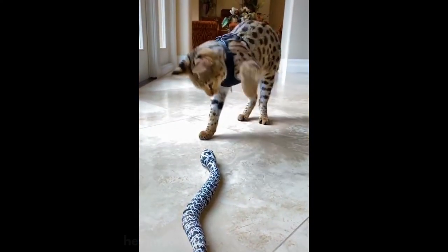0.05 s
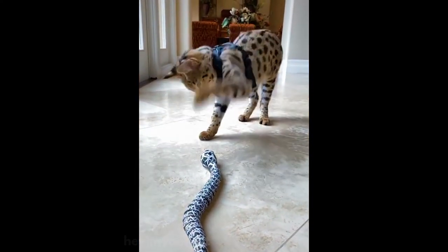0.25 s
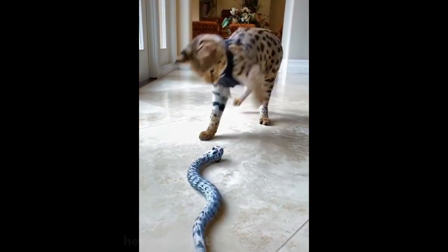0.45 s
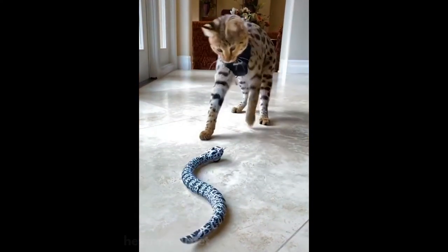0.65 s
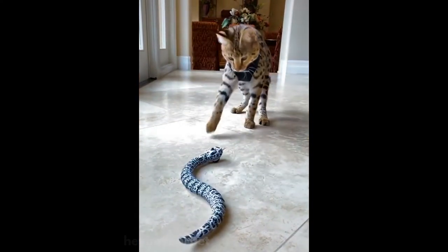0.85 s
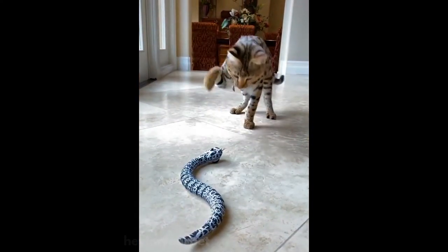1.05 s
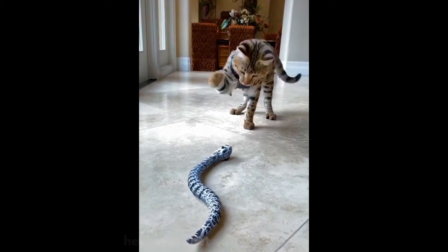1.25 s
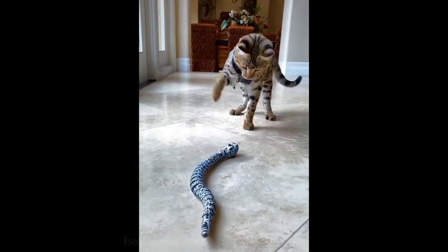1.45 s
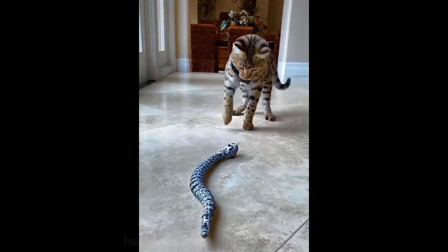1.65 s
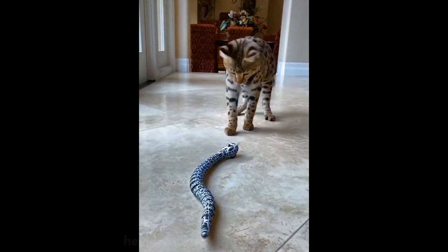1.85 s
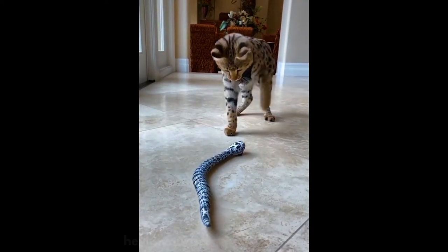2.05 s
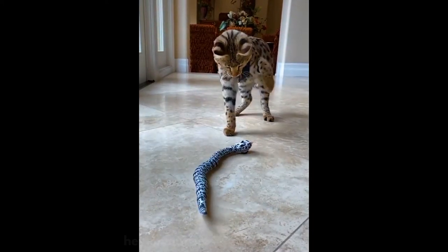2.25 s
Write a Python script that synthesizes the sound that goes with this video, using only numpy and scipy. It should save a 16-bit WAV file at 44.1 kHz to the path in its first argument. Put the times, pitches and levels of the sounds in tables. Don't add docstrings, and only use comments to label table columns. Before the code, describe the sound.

Cat hissing: one sudden spit and two short bubbly hisses, with hard plastic clicks in a tiled hall.

```python
import sys
import numpy as np
from scipy import signal
from scipy.fft import rfft, irfft, next_fast_len
from scipy.io import wavfile
from scipy.ndimage import map_coordinates

SR = 44100
rng = np.random.default_rng(int(sys.argv[2]) if len(sys.argv) > 2 else 0)


def gain_from_db(level_db):
    decades = np.asarray(level_db, float) / 20
    return 10 ** decades


def wav_out(sig):
    wavfile.write(sys.argv[1], SR, np.round(np.clip(np.atleast_2d(sig).T, -1, 1) * 32767).astype(np.int16))


N = 99225


def along(points, hz):
    point_hz, value = np.transpose(points)
    return np.interp(np.log(hz + 1), np.log(point_hz + 1), value)


def resonance(f, centre_hz, width_hz):
    damping = 1j * f * width_hz
    return damping / (centre_hz ** 2 - f * f + damping)


def high_pass(f, edge_hz):
    return -f * f / (edge_hz ** 2 - f * f + 1.2j * f * edge_hz)


def filtered(x, response):
    size = next_fast_len(N + 8192)
    spectrum = rfft(x, size) * response(np.fft.rfftfreq(size, 1 / SR))
    return irfft(spectrum, size)[..., :N]


def noise(response):
    white = rng.standard_normal(N)
    return white, 1 / np.std(filtered(white, response))


def puffs(rows, rise_s):
    start, gain, decay = np.transpose(rows)[..., None]
    t = np.arange(SR // 40) / SR
    rise = 1 - np.exp(-(t / rise_s) ** 2)
    shape = gain * rise * np.exp(-t / np.maximum(decay, 1e-4))
    at = (start * SR).astype(int) + np.arange(len(t))
    return np.bincount(at.ravel(), shape.ravel(), N + SR)[:N]


def hall(x):
    # frequency in Hz, time to fall by 60 dB in seconds.
    ring_times = [(500, 0.72), (2500, 0.65), (5000, 0.62), (9000, 0.45), (13000, 0.24)]
    hz, t, z = signal.stft(rng.standard_normal(SR), SR, nperseg=256)
    fading = z * gain_from_db(-60 * t / along(ring_times, hz)[:, None])
    tail = signal.istft(fading, SR, nperseg=256)[1]
    delayed = np.pad(x, (400, 0))
    return signal.fftconvolve(delayed, tail / np.linalg.norm(tail))[:N]


def room_tone():
    # frequency in Hz, level in dB per Hz.
    air_curve = [(20, -28.5), (40, -6), (62, 2), (130, -7.5), (330, -13), (700, -20), (5000, -29),
                 (13500, -42.5)]
    hum_hz, hum_width_hz = 250, 14
    air = lambda f: gain_from_db(along(air_curve, f))
    hum = lambda f: 1 / (1 + (2 * (f - hum_hz) / hum_width_hz) ** 2)
    out = np.zeros(N)
    for level_db, colour in ((-57.5, air), (-70.5, hum)):
        white, gain = noise(colour)
        out += gain_from_db(level_db) * gain * filtered(white, colour)
    return out


def claws():
    # start in seconds, level in dB, decay in ms, centre in Hz, width in Hz.
    ticks = [
        (.1048, -27.5, 2.25, 5200, 2900),
        (.2105, -25.5, 3.5, 1600, 352),
        (0.212, -22.5, 12.5, 2360, 590),
        (0.215, -37, 6.9, 4170, 700),
        (0.219, -30, 9.7, 9000, 1790),
        (0.339, -15, 4.4, 9200, 2500),
        (1.473, -49, 3.1, 8300, 5000),
    ]
    out = np.zeros(N)
    for start, db, ms, centre_hz, width_hz in ticks:
        colour = lambda f: resonance(f, centre_hz, 1.5 * width_hz) ** 2
        white, gain = noise(colour)
        swell = puffs([(start, gain_from_db(db), ms / 1000)], 0.0014)
        out += gain * filtered(np.sign(white) * swell, colour)
    return out


def toy():
    # start in seconds, peak in dB, extra brightness in dB, hollow knock in dB.
    snaps = [
        (.1056, -26, -15, -1.5),
        (0.9151, -14.5, 3, 0.9),
        (1.083, -14, -30, 2),
        (1.6266, -15, 3.4, -2),
        (1.966, -14, -7, 3.5),
    ]
    # frequency in Hz, level in dB, time to fall by 60 dB in seconds.
    shell_tones = [(737.5, -7.5, 0.023), (952, -9, 0.02), (1463, -13.5, 0.021), (1768, -5, 0.0114),
                   (1930, -3.5, 0.013), (3140, -13.5, 0.026), (4447, 2.5, 0.025), (5840, 0, 0.012),
                   (6350, 7, 0.0073), (6860, -1, 0.012), (8400, -7, 0.012), (9210, -5.5, 0.0075),
                   (12100, -52, 0.0075), (12900, -20, .008)]
    bright_above_hz, scatter_db = 2600, 1.5
    knock_ring_s, longest_ring_s, choked_after_s = .04, .03, .0075
    rattle_db, rattle_t60 = -10.5, 0.01

    out, t = np.zeros(N + SR), np.arange(SR // 10) / SR
    hz, level_db, t60 = np.transpose(shell_tones)[..., None]
    is_knock = hz == hz.min()
    t60 = np.minimum(t60, np.where(is_knock, knock_ring_s, longest_ring_s))
    choke = np.exp(-(~is_knock).astype(float) * (t / choked_after_s) ** 2)
    fade = 1000 ** (-t / t60) * choke
    rise = 1 - np.exp(-t / .0003)
    for start, db, bright_db, knock_db in snaps:
        tone_db = level_db + bright_db * (hz > bright_above_hz) + knock_db * is_knock
        gain = gain_from_db(tone_db + scatter_db * rng.standard_normal(hz.shape))
        ring = (gain * fade * np.sin(2 * np.pi * hz * t)).sum(0) * rise
        rattle_fade = 1000 ** (-t / rattle_t60)
        rattle = gain_from_db(rattle_db + bright_db) * rattle_fade * rng.standard_normal(len(t))
        out[round(start * SR):][:len(t)] += gain_from_db(db - 4) * (ring + rattle)
    dry = filtered(out[:N], lambda f: high_pass(f, 550))
    return dry + gain_from_db(-29) * hall(dry)


def hiss(effort, bursts, mouth, edge_hz, leak_db):
    t = np.arange(N) / SR
    s, db, teeth_db = np.transpose(effort)
    flow = gain_from_db(np.interp(t, s, db, left=-120, right=-120))

    bubbles_per_s, bubble_s, bubble_db, bubble_spread_db = 150, .001, 2.5, 6
    burst_rise_s, burst_db = .0006, -3
    draw = rng.random((400, 2))
    when = s[0] + np.cumsum(-np.log(draw[:, 0])) / bubbles_per_s
    size = gain_from_db(bubble_db + bubble_spread_db * (2 * draw[:, 1] - 1.5))
    rows = np.c_[when, size, np.full(len(when), bubble_s)]
    bubbles = puffs(rows[when < s[-1]], burst_rise_s)
    rows = [(start - burst_rise_s, gain_from_db(peak_db + burst_db), ms / 1000) for start, peak_db, ms in bursts]
    big = puffs(rows, burst_rise_s)

    def tract(f):
        bands = []
        for k, (centre_hz, width_hz, level_db) in enumerate(mouth):
            band = resonance(f, centre_hz, max(width_hz, 350))
            bands.append((-1) ** k * gain_from_db(level_db) * high_pass(f, edge_hz) ** 3 * band)
        bands.append(gain_from_db(leak_db) * resonance(f, 900, 900))
        return np.array(bands)

    white, gain = noise(lambda f: tract(f).sum(0))
    bands = filtered(white * flow * (0.85 + bubbles) + np.sign(white) * big, tract)

    shifts_per_s, shift_db = 45, 2.2
    knots = rng.standard_normal((len(bands), int(N / SR * shifts_per_s) + 4))
    waver_db = shift_db * np.array([map_coordinates(k, [t * shifts_per_s]) for k in knots])
    upper = np.array([centre_hz > 5500 for centre_hz, _, _ in mouth] + [False])[:, None]
    return gain * (bands * gain_from_db(waver_db + upper * np.interp(t, s, teeth_db))).sum(0)


def cat():
    # time in seconds, effort in dB, extra sharpness at the teeth in dB.
    efforts = [
        [(.207, -51, -3.5), (.213, -23, -7.5), (.226, -16, -9), (.236, -32, -2.5), (.252, -33.5, -5.5),
         (.264, -20, -3.5), (.3, -29.5, -6.5), (.345, -27.5, 4), (.4, -37, -1)],
        [(.94, -53, 4.5), (.952, -44, -0.5), (.985, -38.5, 0.5), (1.015, -31, -2.5), (1.085, -27, 1.5),
         (1.14, -34.5, -0.5), (1.17, -34.5, 2.5), (1.225, -32, -0.5), (1.3, -43, -8.5)],
        [(1.71, -60, 5.5), (1.73, -49, 3), (1.765, -39.5, 5.5), (1.79, -36, -2.5), (1.86, -34.5, 1),
         (1.92, -31.5, -2), (1.97, -30, -0.5), (2.0, -36, -4), (2.1, -49, -10)],
    ]
    # start in seconds, peak in dB, length in ms.
    spit_bursts = [(0.284, -12, 0.81), (.294, -15.5, 4.9), (0.326, -20.5, 1.3), (0.3374, -4.5, 2.16),
                   (0.3429, -14.5, 1.3), (0.444, -23.5, 4.4)]
    middle_bursts = [(.950, -24, 2), (0.965, -33, 1.1), (0.998, -16.5, 1.18), (1.013, -13.5, 3.04),
                     (1.026, -17, 1.6), (1.056, -17, 1.2), (1.063, -11, 0.78), (1.081, -22, 1.1),
                     (1.0907, -18, 1), (1.102, -13.5, 1.2), (1.12, -17, 2.5), (1.145, -10, 0.4),
                     (1.158, -9.5, 1.33), (1.169, -16, 1.9), (1.178, -15, 0.83), (1.205, -24, 0.48),
                     (1.213, -13, 1.16), (1.2198, -13, 1.44), (1.2245, -18, 0.63)]
    last_bursts = [(1.727, -33.5, 2.7), (1.756, -37, 1.5), (1.785, -15, 1.16), (1.79, -16.5, 1.04),
                   (1.797, -18, 1.7), (1.811, -19, 0.78), (1.832, -14.5, 1.8), (1.862, -20, 1),
                   (1.886, -29, 1.05), (1.9045, -22, 1.4), (1.9177, -14, 1.1), (1.939, -25, 1.1),
                   (1.9456, -20, 1.6), (1.9514, -10.5, 0.57), (1.9586, -2.5, 0.5), (1.964, -16, 1.2),
                   (1.978, -14, 1.4)]
    # centre in Hz, width in Hz, level in dB.
    spit_mouth = [(1600, 600, -12.5), (2500, 550, -0.5), (4080, 1120, -1.5), (5940, 1900, -2),
                  (8830, 1620, -4.5), (13500, 2400, -21.5)]
    middle_mouth = [(1970, 530, -4.5), (2480, 550, -2.5), (3910, 565, 0), (4960, 630, -0.5),
                    (6200, 2000, -8.5), (8810, 940, -1.5), (12600, 1200, -29.5)]
    last_mouth = [(1850, 400, -7.5), (2500, 510, -3), (3807, 480, -1.5), (4857, 604, -4), (6060, 880, -7),
                  (8840, 1010, -3.5), (12600, 400, -32)]
    edges_hz = [1400, 1750, 1750]
    leaks_db = [-20, -27, -27.5]
    hall_levels_db = [-9, -12, -9.5]
    all_bursts = (spit_bursts, middle_bursts, last_bursts)
    mouths = (spit_mouth, middle_mouth, last_mouth)
    out = np.zeros(N)
    for *settings, hall_db in zip(efforts, all_bursts, mouths, edges_hz, leaks_db, hall_levels_db):
        dry = hiss(*settings)
        out += dry + gain_from_db(hall_db) * hall(dry)
    return out


def paw():
    # level in dB, first pitch in Hz, last pitch in Hz, time to fall by 60 dB in seconds.
    thump = (-39, 190, 75, .095)
    db, first_hz, last_hz, t60 = thump
    t = np.maximum(np.arange(N) / SR - .212, 0)
    hz = last_hz + (first_hz - last_hz) * np.exp(-t / 0.013)
    phase = 2 * np.pi * np.cumsum(hz * (t > 0)) / SR
    return gain_from_db(db) * 1000 ** (-t / t60) * np.sin(phase)


def tongue_pops():
    # start in seconds, level in dB, decay in ms, pitch in Hz.
    pops = [
        (.327, -22, 2.5, 7500),
        (.9645, -31, 1.5, 4600),
        (1.727, -28, 1.6, 2520),
        (1.8305, -22, 1.6, 2450),
        (2.078, -35, 2, 3100),
    ]
    t = np.arange(N) / SR
    out = np.zeros(N)
    for start, db, ms, hz in pops:
        out += puffs([(start, gain_from_db(db), ms / 1000)], .001) * np.sin(2 * np.pi * hz * t)
    return out


def scene():
    return (room_tone() + claws() + toy() + cat() + paw() + tongue_pops())[None]


def low_pass(x):
    return signal.sosfilt(signal.butter(12, 14010, fs=SR, output="sos"), x)


def record(dry):
    top_hz, slope_hz = 12950, 60
    band = lambda f: 1 / (1 + np.exp(np.clip((f - top_hz) / slope_hz, -50, 5)))
    return low_pass(filtered(dry, band))


dry = scene()
out = record(dry)
wav_out(out)
```